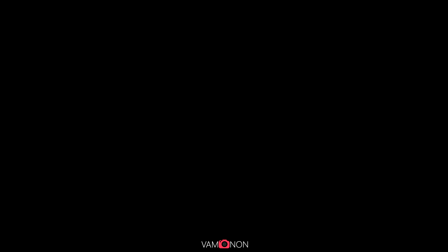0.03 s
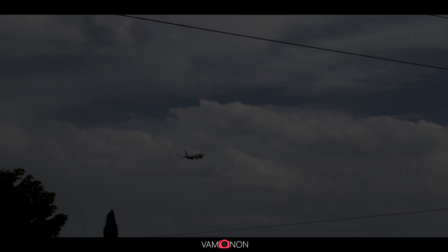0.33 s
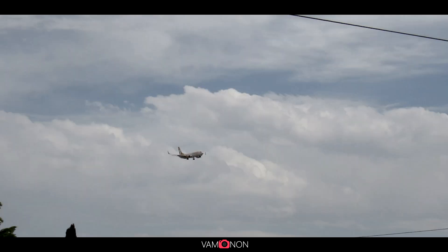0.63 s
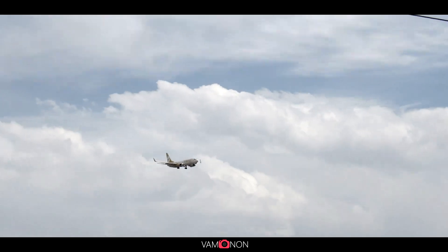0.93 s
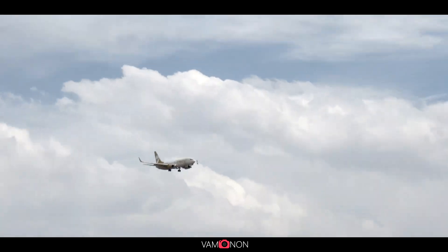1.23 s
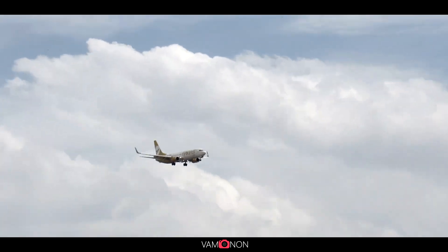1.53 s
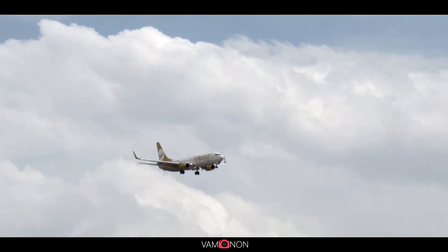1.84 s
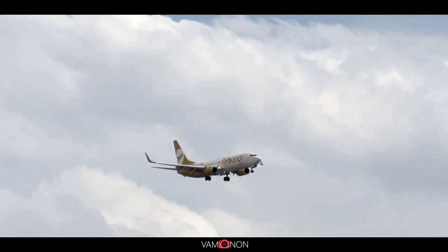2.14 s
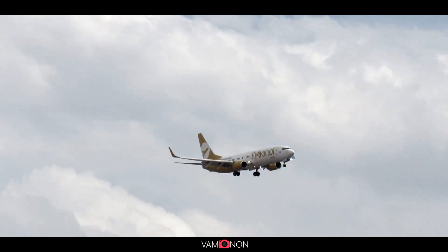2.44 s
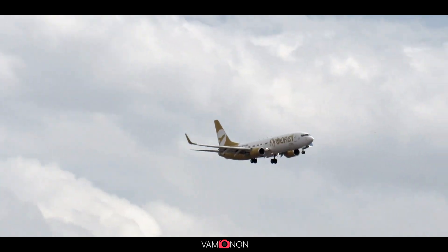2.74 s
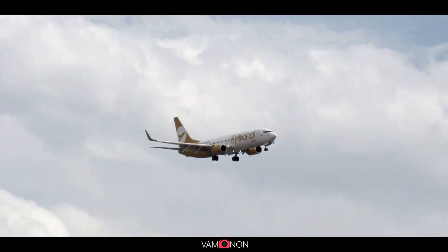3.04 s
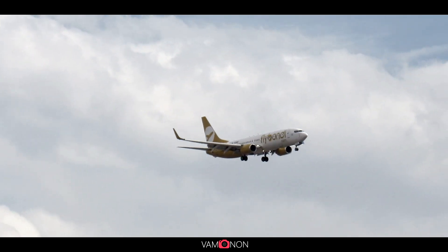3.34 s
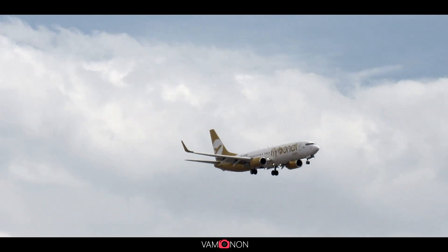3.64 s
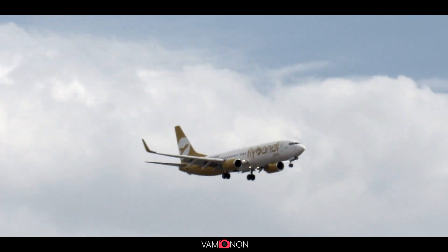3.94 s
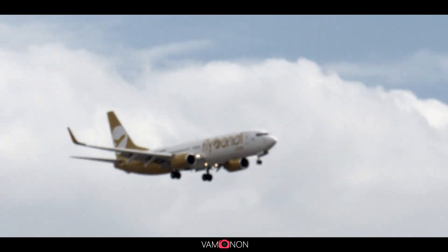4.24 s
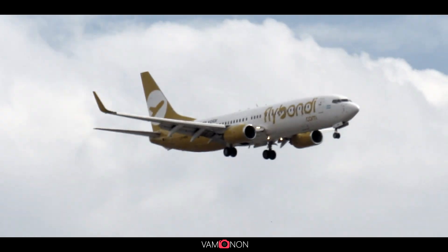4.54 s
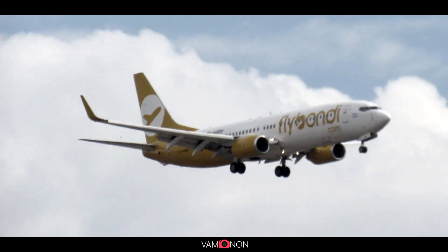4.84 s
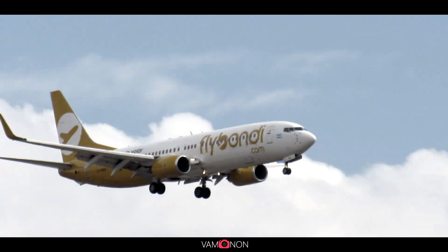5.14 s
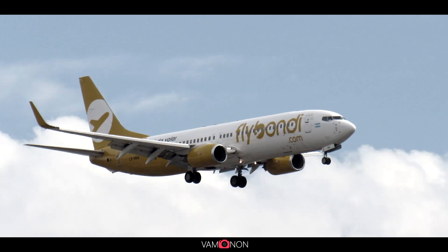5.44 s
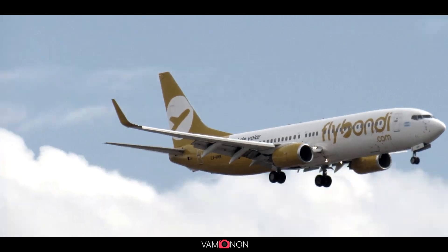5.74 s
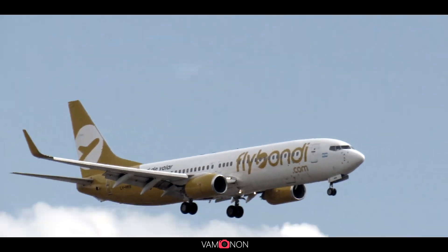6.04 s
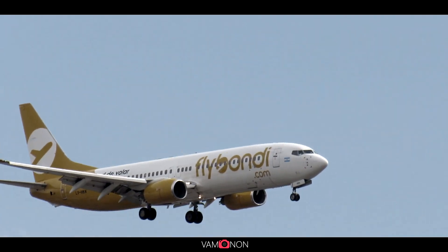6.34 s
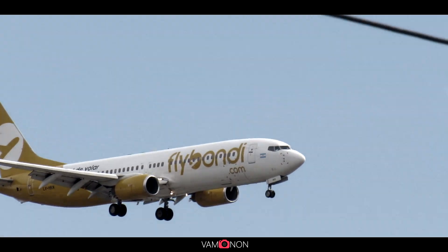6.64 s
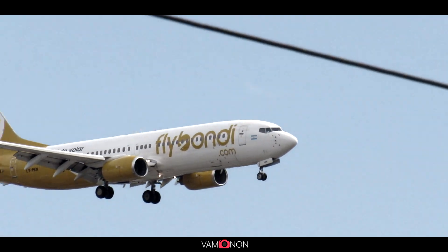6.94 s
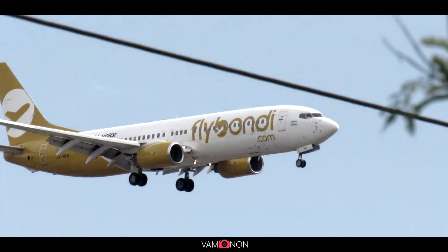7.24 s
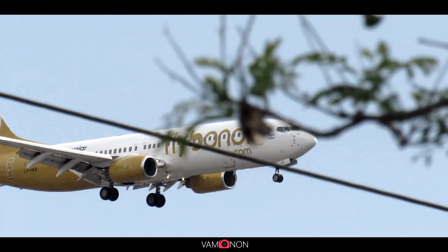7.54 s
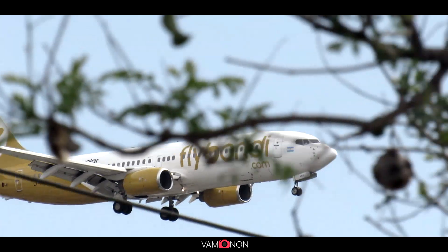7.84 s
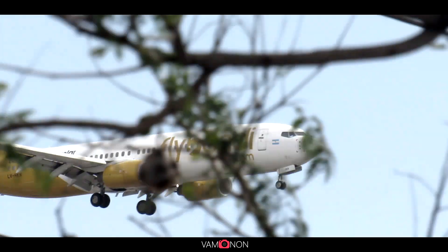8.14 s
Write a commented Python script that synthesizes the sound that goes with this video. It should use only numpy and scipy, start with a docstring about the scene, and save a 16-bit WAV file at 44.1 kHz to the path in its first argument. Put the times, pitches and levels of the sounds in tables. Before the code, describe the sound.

Heard from the ground on a gusty day, an approaching jet plane rumbles low, its roar swelling and ebbing in the moving air. A small sharp snap sounds close by, then wind hits the microphone in uneven, booming bursts. After the heaviest buffeting, the engines' airy rush rises and the plane sounds closer, before wind thumps take over again. Leaves rustle very faintly behind it.

```python
"""A jet airliner on final approach, heard from the ground on a gusty day.
Its exhaust rumble and airframe roar swell and fade in moving air; the fans' rush brightens as it nears.
Gusts buffet and thump two microphone ports; the level sinks at the thumps and creeps back.
Under it: a few small snaps, a leafy rustle, a far engine drone, a camera's thin hiss and motor whine."""
import sys
import numpy as np
from scipy import signal
from scipy.fft import rfft, irfft, next_fast_len
from scipy.io import wavfile
from scipy.ndimage import uniform_filter1d, minimum_filter1d

SR = 44100
rng = np.random.default_rng(int(sys.argv[2]) if len(sys.argv) > 2 else 0)


def wav_out(sig):
    """Save sig, one row per channel (or a flat mono array), as 16-bit PCM at SR to the path in sys.argv[1]."""
    wavfile.write(sys.argv[1], SR, np.round(np.clip(np.atleast_2d(sig).T, -1, 1) * 32767).astype(np.int16))


N = 369999

# Exhaust, airframe and fan spectra: (frequency [Hz], relative density [dB])
RUMBLE_SPECTRUM = [(15, -30), (28, -32), (48, -16), (70, -6), (110, 1), (140, 1.5), (185, 0.5), (265, -2),
                   (315, -4), (420, -3.5), (600, -11), (900, -28), (2000, -45)]
ROAR_SPECTRUM = [(300, -39), (600, -4), (820, -3), (980, 0), (1230, -6.5), (1480, -7), (1700, -16.5),
                 (2000, -35), (4000, -66)]
RUSH_SPECTRUM = [(400, -31), (600, -1.5), (750, -19), (1000, 2.5), (1300, 2.5), (1700, 4), (2200, 0.5),
                 (2700, -7), (3300, -14.5), (4200, -33), (6000, -50)]
FAN_HISS_SPECTRUM = [(2200, 1.5), (3200, 1.5), (4000, -2), (5000, -6), (6000, -6.5), (8000, -16),
                     (12000, -23)]
# Exhaust rumble: (time [s], level [dB])
RUMBLE_LEVEL = [(0.9, -29.5), (1.45, -28), (1.8, -28.5), (2.3, -26.5), (2.45, -25.5), (2.85, -28.5),
                (3.1, -27.5), (3.4, -26), (3.8, -26.5), (3.95, -25), (4.3, -27), (4.9, -26.5), (5.5, -28),
                (6.2, -26), (6.55, -24.5), (6.8, -25.5), (7.15, -23.5), (7.29, -20.5), (7.4, -21.5),
                (7.6, -24), (7.9, -24.5)]
# Approach through moving air: (time [s], airframe roar [dB], fan rush [dB])
APPROACH_LEVELS = [(1.8, -40, -62), (2.45, -36.5, -59.5), (3.05, -39, -52.5), (3.5, -34.5, -47.5),
                   (3.66, -37, -43), (3.78, -37.5, -42), (3.87, -36, -50.5), (4.2, -35.5, -54),
                   (4.45, -32, -50), (5.1, -39.5, -54), (5.4, -37, -48.5), (5.75, -36.5, -41),
                   (6.2, -33.5, -36), (6.52, -28.5, -34), (6.82, -36, -36.5), (6.92, -36, -35.5),
                   (7.0, -32, -31.5), (7.09, -32.5, -31.5), (7.18, -30.5, -28.5), (7.29, -27.5, -31),
                   (7.44, -33, -32.5), (7.56, -29, -32), (7.72, -33, -35), (7.85, -34, -35.5),
                   (8.39, -32.5, -35.5)]
HISS_OVER_RUSH_DB, HISS_SWING_SHARE = -9, 0.35

def airliner():
    """The lows carry far; the fans only get through close by, and their hiss follows their rush."""
    roar_db, rush_db = in_time(APPROACH_LEVELS)
    rumble_db, = in_time(RUMBLE_LEVEL)
    hiss_db = rush_db.mean() + HISS_OVER_RUSH_DB + HISS_SWING_SHARE * (rush_db - rush_db.mean())
    rumble = from_db(rumble_db) * turbulence(RUMBLE_SPECTRUM, side_db=-10.5, flutter_db=0.5, pan_db=-2.5)
    roar = from_db(roar_db) * turbulence(ROAR_SPECTRUM, side_db=-6.5, flutter_db=0.66, pan_db=-1.5)
    rush = from_db(rush_db) * turbulence(RUSH_SPECTRUM, side_db=-10, flutter_db=0.86, pan_db=0.3)
    hiss = from_db(hiss_db) * turbulence(FAN_HISS_SPECTRUM, side_db=-30, flutter_db=1, pan_db=-1)
    return reflection_notch(rumble + roar) + rush + hiss


# Scattered sound, falling as the aircraft nears: (time [s], gain [dB])
SCATTER_GAIN = [(1.0, -3), (5.3, -4), (7.0, -6.5)]

def turbulence(spectrum, side_db, flutter_db, pan_db):
    """Flow noise flutters through uneven air; the surroundings scatter some to the sides."""
    scatter_db, = in_time(SCATTER_GAIN)
    direct = evened(coloured(spectrum), 0.16) * from_db(flutter_db * drift(11))
    scattered = from_db(side_db + scatter_db) * coloured(spectrum)
    return stereo(direct, scattered, pan_db)


# Notch, shallower when the aircraft stands higher: (time [s], centre gain [dB])
NOTCH_GAIN = [(5.0, -15), (6.3, -6.5), (8.0, -12.5)]
NOTCH_HZ, NOTCH_WIDTH_HZ = 691, 207

def reflection_notch(x):
    """Far sound comes in low and its reflection cancels one band."""
    centre_db, = in_time(NOTCH_GAIN)
    notched = signal.lfilter(*signal.iirnotch(NOTCH_HZ, NOTCH_HZ / NOTCH_WIDTH_HZ, fs=SR), x)
    return notched + from_db(centre_db) * (x - notched)


# Gusts at the ports: (start [s], length [s], level [dB])
GUSTS = [(1.082, 0.19, -20.5), (1.364, 0.041, -23), (1.495, 0.023, -21.5), (1.78, 0.037, -20),
         (1.877, 0.046, -20.5), (2.256, 0.017, -20), (2.522, 0.14, -10), (2.721, 0.053, -12.5),
         (2.866, 0.16, -29), (3.68, 0.02, -30), (3.916, 0.05, -16.5), (4.082, 0.13, -12.5),
         (4.257, 0.083, -12.5), (4.359, 0.13, -4.5), (4.664, 0.19, -7.5), (4.905, 0.286, -6),
         (5.27, 0.064, -14), (5.622, 0.012, -19), (6.46, 0.045, -16.5), (6.57, 0.06, -10),
         (6.745, 0.018, -20), (6.881, 0.11, -13), (7.314, 0.074, -13.5), (7.438, 0.05, -12.5),
         (7.628, 0.064, -12.5), (7.778, 0.12, -11.5), (8.0, 0.062, -8.5), (8.138, 0.072, -4),
         (8.23, 0.051, -8), (8.32, 0.1, -3)]
# Breeze between gusts: (time [s], level [dB])
BREEZE_LEVEL = [(1.0, -34), (3.3, -46), (5.5, -33), (6.25, -37), (6.8, -21.5), (7.2, -24), (7.7, -23)]
GUST_RISE_DB_PER_S, GUST_FALL_DB_PER_S = 396, 295

def gust_level_db():
    """Each gust rises quickly, holds and dies back into the breeze."""
    t = np.arange(N) / SR
    level_db, = in_time(BREEZE_LEVEL)
    for start_s, length_s, db in GUSTS:
        rise_db = GUST_RISE_DB_PER_S * np.maximum(start_s - t, 0)
        fall_db = GUST_FALL_DB_PER_S * np.maximum(t - start_s - length_s, 0)
        level_db = np.maximum(level_db, db - rise_db - fall_db)
    return level_db


def wind(corner_hz, db_per_octave, rise, steepness, eddy_depth_db, common_db):
    """Eddies hit the ports mostly in opposition; harder gusts have smaller eddies and reach higher."""
    gust_db = gust_level_db()
    eddies_db = eddy_depth_db * np.tanh(drift(46))
    shift_octaves = np.clip(gust_db + eddies_db + 8.5, -20, 6) / db_per_octave
    moving_corner_hz = corner_hz * 2 ** shift_octaves
    common, opposed = 0, 0
    for centre_hz in 25 * 2 ** np.arange(0, 5.5, .5):  # half-octave bands
        ratio = centre_hz / moving_corner_hz
        gain = from_db(eddies_db) * ratio ** rise / np.sqrt(1 + ratio ** steepness)
        band = lambda hz: np.exp(-(3 * np.log2(hz / centre_hz)) ** 2)
        common += gain * noise(band)
        opposed += gain * noise(band)
    mid = from_db(common_db) * evened(common, 0.095)
    return from_db(gust_db) * stereo(mid, evened(opposed, 0.0455), pan_db=-1.5)


# Fine eddies shed by a thump: (frequency [Hz], relative density [dB])
PUFF_SPECTRUM = [(180, -6), (280, 7.5), (420, -8), (600, -21), (900, -28)]
# Hardest eddies: (time [s], swing [dB], frequency [Hz], 1/e half-width [cycles], thud [dB], sink [dB])
THUMPS = [(1.9, -12, 110, 1.2, -41, 0.5), (2.27, -16, 120, .7, -28, 1), (2.544, -7.5, 140, .6, -31, 3),
          (2.638, -6, 120, .9, -22, 6), (3.945, -11, 105, .9, -18.5, -0.5), (4.105, -8, 100, .8, -24, 0.5),
          (4.128, -5, 120, .8, -19, 1.5), (4.164, -5, 110, .9, -32, 5), (4.348, -3, 130, 1, -23, 6.5),
          (4.385, 1.5, 186, 0.78, -40, 12), (4.429, -3, 163, .75, -28, 11.5),
          (4.626, -11, 150, 0.64, -37, 8), (4.651, -5.5, 175, 0.81, -25, 9), (4.72, -13, 230, .7, -26, 9),
          (4.783, -10, 125, 1.6, -28, 12), (4.952, -8, 130, 1.6, -28, 8), (5.025, -14, 200, 1.7, -34, 8),
          (5.111, -9, 140, 1.9, -30, 9.5), (5.157, -9, 110, 1, -28, 8), (5.192, -8, 170, .7, -33, 9),
          (6.604, -5, 119, 1.6, -17.5, 5.5), (7.327, -10, 100, 1.3, -33, 1), (7.38, -6, 170, .7, -18, 3.5),
          (7.687, -8, 140, .7, -22, 0.5), (7.802, -7.5, 89.5, .8, -23, 3.5), (7.836, -7, 100, 1, -31, 2.5),
          (7.897, -9, 130, .7, -14.5, 3.5), (8.034, -0.5, 141, .8, -29, 7),
          (8.112, -4.5, 110, 0.7, -22, 8.5), (8.162, -3.5, 127, 2.4, -19.5, 9.5),
          (8.2, 1, 185, 0.54, -21, 16.5)]
THUD_HZ, THUD_HALF_WIDTH_S = 76.7, 0.011

def thumps(common_db, pan_db, puff_db, puff_db_per_octave):
    """A large eddy swings the pressure between the ports and thuds on both; faster swings puff more."""
    t = np.arange(N) / SR
    swing, thud, puff = np.zeros((3, N))
    mean_hz = np.mean([row[2] for row in THUMPS])
    for time_s, db, hz, cycles, thud_db, _ in THUMPS:
        swing_phase, thud_phase = rng.uniform(0, 2 * np.pi, 2)
        near = abs(t - time_s) < 10 / hz
        age_s = t[near] - time_s
        swell = from_db(db) * np.exp(-(age_s * hz / cycles) ** 2)
        swing[near] += swell * np.cos(2 * np.pi * hz * age_s + swing_phase)
        puff[near] += swell * from_db(puff_db + puff_db_per_octave * np.log2(hz / mean_hz))
        push = from_db(thud_db) * np.exp(-(age_s / THUD_HALF_WIDTH_S) ** 2)
        thud[near] += push * np.cos(2 * np.pi * THUD_HZ * age_s + thud_phase)
    swing += puff * coloured(PUFF_SPECTRUM)
    return stereo(from_db(common_db) * swing + thud, swing, pan_db)


def sinking_db(onset_s, recovery_db_per_s):
    """The level drops at the thumps and creeps back at a steady rate."""
    t, sunk_db = np.arange(N) / SR, 0
    for time_s, *_, depth_db in THUMPS:
        onset = np.clip((t - time_s) / onset_s + .5, 0, 1)
        sunk_db = np.maximum(sunk_db, onset * (depth_db - recovery_db_per_s * (t - time_s)))
    return -sunk_db


# Snaps near the microphone: (time [s], strength [dB])
SNAPS = [(2.2057, -9), (2.2086, -3.5), (2.2099, -10), (4.733, -24)]
# Their resonances: (frequency [Hz], width [Hz], gain [dB])
SNAP_MODES = [(1600, 280, 3), (2000, 290, 3), (3200, 900, -12.5), (4470, 490, -7), (6850, 4300, -14),
              (12500, 5000, -17.5)]

def snaps(decay_s, side_db):
    """Each snap is a very short crackle that rings a few damped resonances."""
    t = np.arange(N) / SR
    envelope = sum(from_db(db) * (t >= time_s) * np.exp(-np.minimum(abs(t - time_s) / decay_s, 50))
                   for time_s, db in SNAPS)
    crackle = envelope * rng.choice([-1, 1], (2, N)) / np.sqrt(decay_s * SR / 2)
    mid, side = sum(from_db(db) * signal.lfilter(*signal.iirpeak(hz, hz / width_hz, fs=SR), crackle)
                    for hz, width_hz, db in SNAP_MODES)
    return stereo(mid, from_db(side_db) * side)


# Rustle swells: (time [s], level [dB])
RUSTLE_LEVEL = [(2.5, -67), (3.0, -62.5), (3.5, -58), (3.7, -57), (3.79, -55.5), (3.9, -67), (4.12, -61),
                (4.45, -69), (5.1, -66), (5.4, -59), (6.35, -57.5), (7.0, -63)]
# Rustle spectrum: (frequency [Hz], relative density [dB])
RUSTLE_SPECTRUM = [(2000, -15), (3200, -8), (5400, 2.5), (6800, -3), (10000, -9), (13000, -20)]

def rustle():
    """A faint rustle, as of leaves, comes from all around, unrelated in the two ears."""
    level_db, = in_time(RUSTLE_LEVEL)
    return from_db(level_db) * np.array([coloured(RUSTLE_SPECTRUM), coloured(RUSTLE_SPECTRUM)])


# Far engine: (frequency [Hz], width [Hz], relative level [dB])
DRONE_LINES = [(48.5, 4, 17), (92.9, 2.05, 27), (138.3, 4.8, 24), (264.8, 3.8, 18), (819, 6.3, 3)]

def far_drone():
    """A distant engine hums in a few wavering lines."""
    return sum(from_db(db) * tone(hz, width_hz) for hz, width_hz, db in DRONE_LINES)


# Motor: (frequency [Hz], width [Hz], level before pace change [dB], level after [dB])
WHINE_LINES = [(5525, 24, -27, -20), (6146, 16, -19, -20), (6244, 14, -20, -16), (6446, 30, -16, -13),
               (6712, 40, -10, -11.5), (7003, 34, -19.5, -17), (7186, 18, -19.5, -19), (8132, 30, -15, -18),
               (8690, 130, -15, -26), (9239, 40, -25, -19.5), (10632, 40, -19.5, -21)]
# Whine against the hiss: (time [s], gain [dB])
WHINE_GAIN = [(1.3, -0.5), (3.0, 4), (7.8, 5.5)]
PACE_CHANGE_S = (5.35, 5.6)

def motor_whine():
    """The camera motor's whine grows; its lines trade strength as it changes pace."""
    gain_db, = in_time(WHINE_GAIN)
    blend = np.interp(np.arange(N) / SR, PACE_CHANGE_S, [0, 1])
    lines = sum(from_db(before_db + blend * (after_db - before_db)) * tone(hz, width_hz)
                for hz, width_hz, before_db, after_db in WHINE_LINES)
    return from_db(gain_db) * lines


# Camera hiss: (frequency [Hz], relative density [dB])
CAMERA_HISS_SPECTRUM = [(1500, -11), (2000, -2), (2600, 5.5), (3400, -18), (4800, -22), (5800, -6),
                        (6900, 4.5), (8200, 2), (10000, -1), (12300, 1), (13500, -14), (15000, -22)]
# Left port against right: (frequency [Hz], phase lead [rad])
PORT_PHASE = [(2500, 0.5), (4000, -9.3), (5300, -0.2), (6700, -1.55), (8600, -1.5), (10600, -2.1),
              (13000, -4.3), (15000, -20)]

def camera_noise(shared_power, flutter_db):
    """Hiss and whine from inside reach the ports out of step; each port also has hiss of its own."""
    inside = motor_whine() + coloured(CAMERA_HISS_SPECTRUM)
    gain = from_db(3.5 + flutter_db * drift(27))
    size = next_fast_len(N, True)
    lead_rad = np.interp(np.fft.rfftfreq(size, 1 / SR), *np.transpose(PORT_PHASE))
    left = irfft(rfft(inside, size) * np.exp(1j * lead_rad), size)[:N]
    own_hiss = np.array([coloured(CAMERA_HISS_SPECTRUM), coloured(CAMERA_HISS_SPECTRUM)])
    ports = np.sqrt(shared_power) * np.array([left, inside]) + np.sqrt(1 - shared_power) * own_hiss
    return gain * ports * from_db([[-.7], [.7]])


def from_db(db):
    """Decibels to gain."""
    return 10 ** (np.asarray(db) / 20)


def rms_one(x):
    """Scale to rms 1."""
    return x / np.sqrt(np.mean(x ** 2) + 1e-20)


def evened(x, window_s):
    """Hold the running rms at 1."""
    return x / np.sqrt(uniform_filter1d(x ** 2, max(int(window_s * SR), 2)) + 1e-9)


def in_time(rows):
    """Each column of a curve, sample by sample."""
    times_s, *columns = np.transpose(rows)
    return [np.interp(np.arange(N) / SR, times_s, column) for column in columns]


def drift(rate_hz):
    """Slow random wander with spread 1."""
    hop, warm_up = 40, 2000
    pole = np.exp(-2 * np.pi * rate_hz * hop / SR)
    white = rng.standard_normal(N // hop + warm_up + 2)
    slow = signal.lfilter([1], [1, -2 * pole, pole * pole], white)[warm_up:]
    return np.interp(np.arange(N) / hop, np.arange(len(slow)), rms_one(slow))


def noise(gain_at):
    """Noise of rms 1 whose gain is a function of frequency."""
    size = next_fast_len(N, True)
    hz = np.maximum(np.fft.rfftfreq(size, 1 / SR), 1)
    return rms_one(irfft(rfft(rng.standard_normal(size)) * gain_at(hz), size)[:N])


def coloured(spectrum):
    """Noise of rms 1 with the given spectrum, silent outside it."""
    points_hz, db = np.transpose(spectrum)
    return noise(lambda hz: from_db(np.interp(np.log(hz), np.log(points_hz), db, -np.inf, -np.inf)))


def tone(centre_hz, width_hz):
    """A wavering line of rms 1: noise in a narrow resonance."""
    return evened(noise(lambda hz: 1 / (1 + (2 * (hz - centre_hz) / width_hz) ** 2)), 0.37)


def stereo(mid, side, pan_db=0):
    """Left and right from their common and opposed parts."""
    return np.array([(mid + side) * from_db(pan_db / 2), (mid - side) * from_db(-pan_db / 2)])


def limited(x, ceiling, look_ahead_s):
    """A look-ahead limiter ducks smoothly under the peaks of the hardest gusts."""
    size = int(look_ahead_s * SR)
    allowed = np.minimum(1, ceiling / (abs(x).max(axis=0) + 1e-9))
    return x * uniform_filter1d(minimum_filter1d(allowed, 2 * size + 1), size)


# Brief dip of airliner and background: (time [s], gain [dB])
DIP_GAIN = [(3.69, 1.5), (3.71, -1), (3.75, -4.5), (3.77, 1.1)]
BACKGROUND_GAIN_DB = -61

def scene():
    """Airliner, wind, rustle and background sink together under the thumps; snaps lie on top."""
    dip_db, = in_time(DIP_GAIN)
    gusts = wind(corner_hz=127.4, db_per_octave=21, rise=1.78, steepness=10.8,
                 eddy_depth_db=4.5, common_db=-12.5)
    jet = airliner()
    background = from_db(BACKGROUND_GAIN_DB) * (far_drone() + camera_noise(shared_power=.6, flutter_db=1))
    air = from_db(dip_db) * (jet + background) + rustle() + gusts
    air *= from_db(sinking_db(onset_s=0.038, recovery_db_per_s=4))
    thumping = thumps(common_db=-22.5, pan_db=-0.34, puff_db=-21, puff_db_per_octave=11)
    return air + thumping + snaps(decay_s=0.0014, side_db=-1)


FADE_IN_S, FADE_POWER = 1.328, 2.72
LOW_CUT_HZ, STOPBAND_HZ = 32, 15400

def record(dry):
    """Fade-in, low cut, peak limiter, steep high cut."""
    fade = np.minimum(np.arange(N) / SR / FADE_IN_S, 1) ** FADE_POWER
    low_cut = signal.butter(2, LOW_CUT_HZ, "high", fs=SR, output="sos")
    high_cut = signal.cheby2(16, 60, STOPBAND_HZ, fs=SR, output="sos")
    trimmed = signal.sosfilt(low_cut, fade * dry)
    return signal.sosfilt(high_cut, limited(trimmed, ceiling=.97, look_ahead_s=.012))


dry = scene()
out = record(dry)
wav_out(out)
```